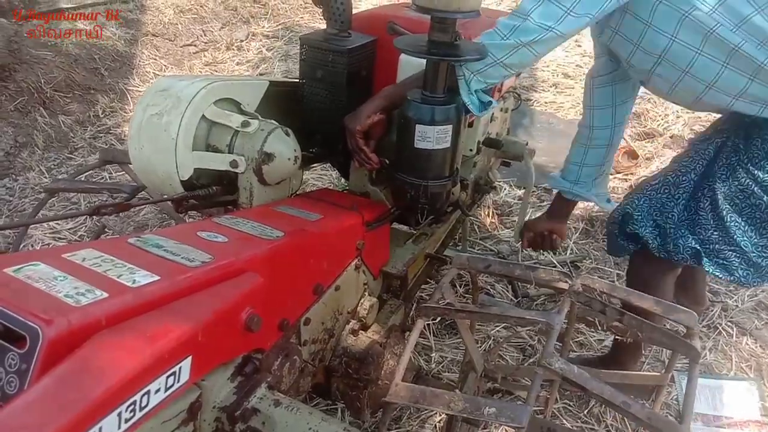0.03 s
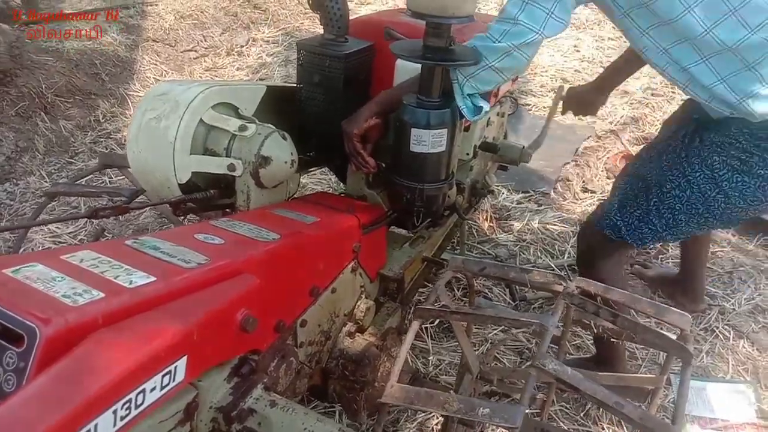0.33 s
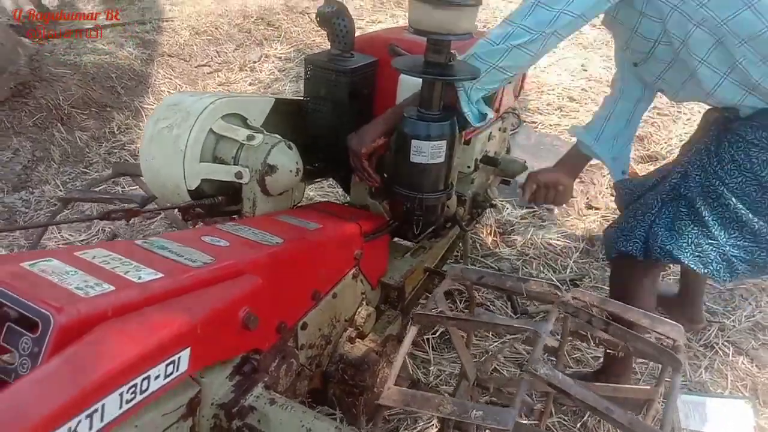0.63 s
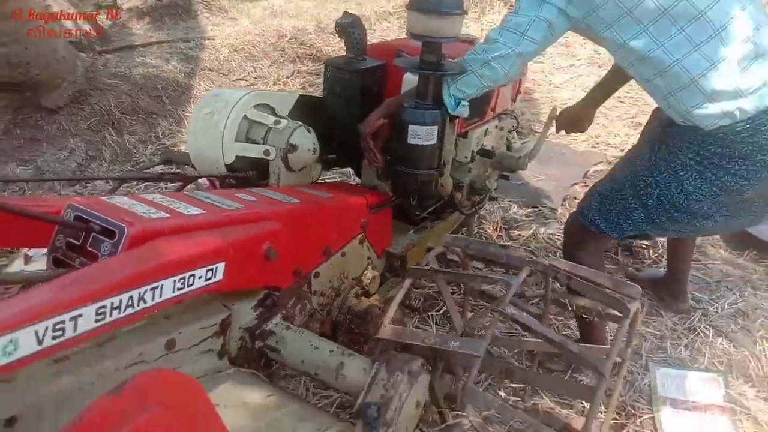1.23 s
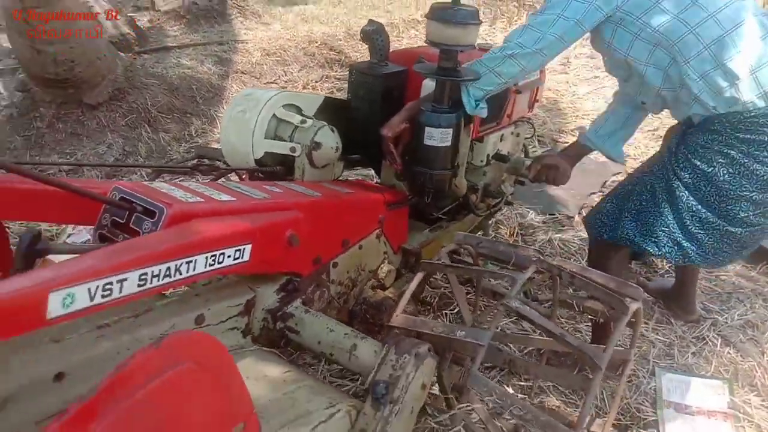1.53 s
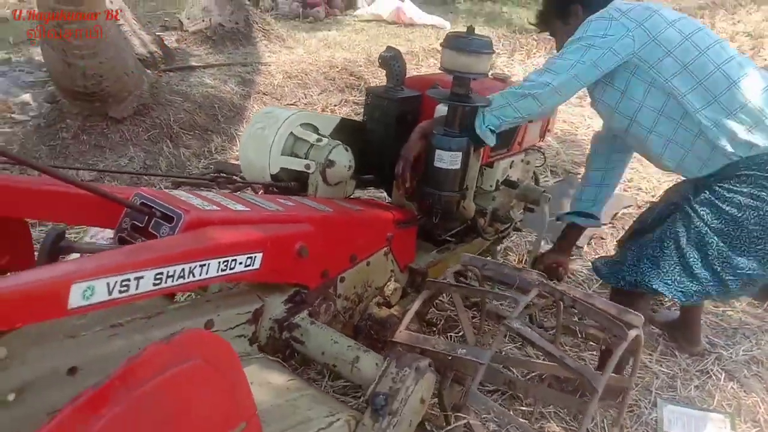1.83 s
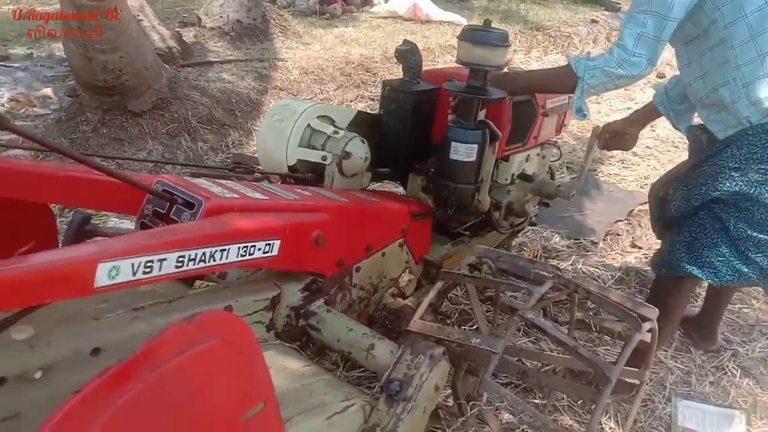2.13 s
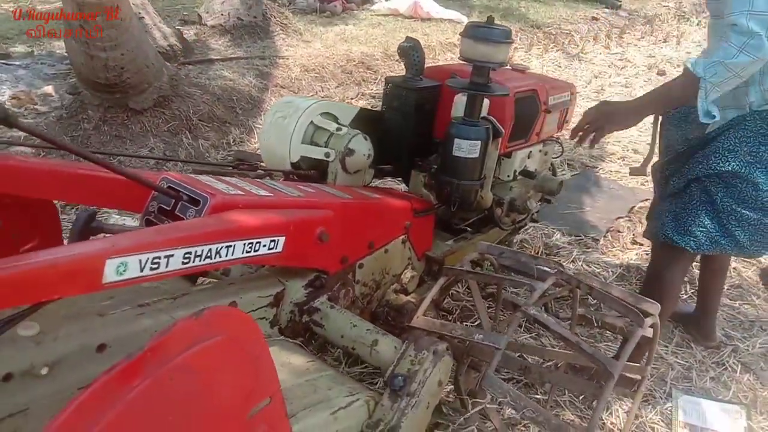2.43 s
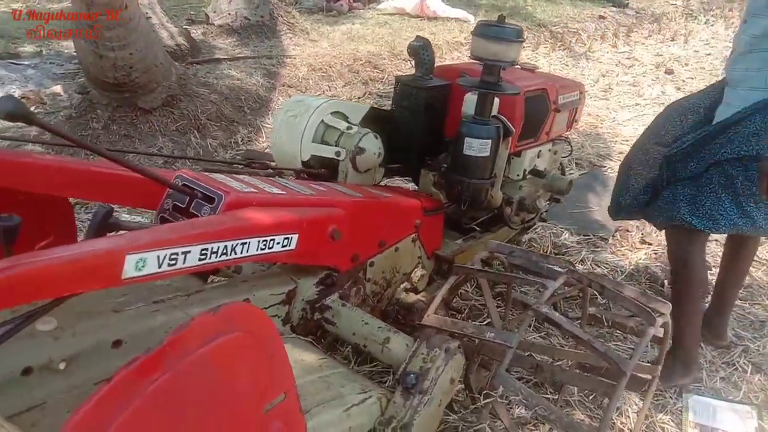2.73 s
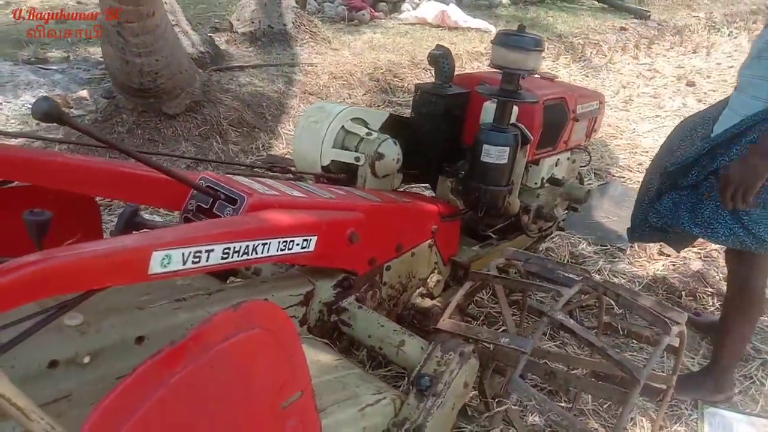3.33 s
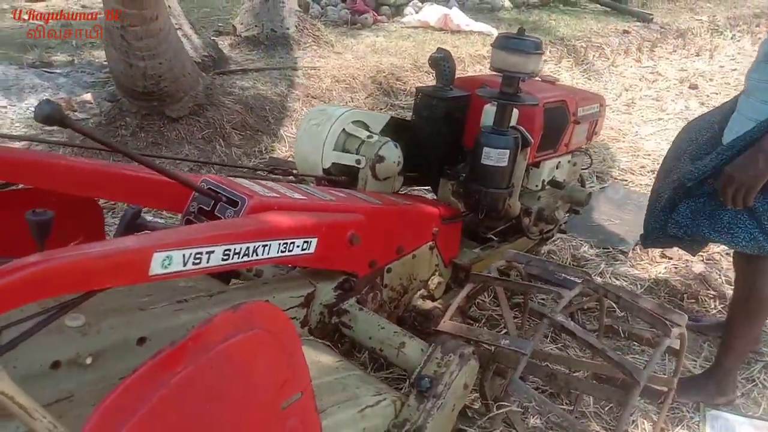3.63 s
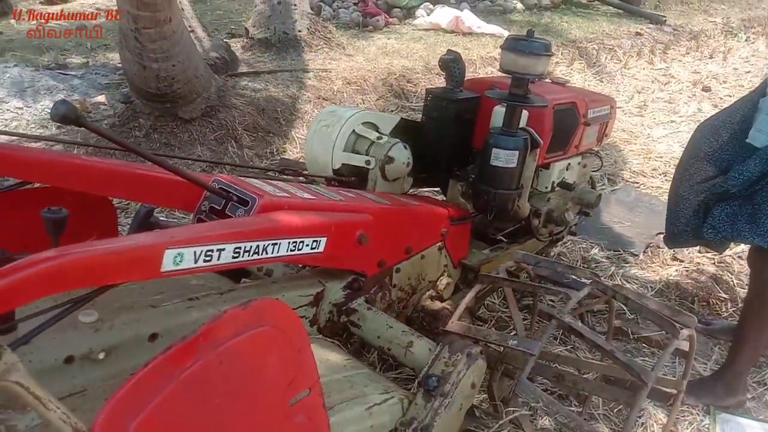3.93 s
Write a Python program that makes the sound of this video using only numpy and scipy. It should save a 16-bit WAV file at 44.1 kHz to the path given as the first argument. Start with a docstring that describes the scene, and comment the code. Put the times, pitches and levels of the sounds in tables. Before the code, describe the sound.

Close up in the open air, a farm tiller's diesel engine is hand-cranked with light ticks, dry squeaks and two thin squeals. It then fires and gathers speed, knocking and puffing over clanking metal.

```python
"""Hand-cranking a diesel tiller

A single-cylinder diesel is turned by hand outdoors: the valve gear ticks, the dry crank squeaks by
stick-slip friction and a rubbed steel part squeals. The engine catches and gathers speed. Each cycle
is a combustion knock, an exhaust chuff up to a quarter cycle later and the clatter of valves and
piston. Loose parts clank under the jolts, and the frame rings along in forced vibration."""
import sys
import numpy as np
from scipy import signal
from scipy.fft import rfft, irfft, next_fast_len
from scipy.io import wavfile
from scipy.ndimage import uniform_filter1d, map_coordinates

SR = 44100
rng = np.random.default_rng(int(sys.argv[2]) if len(sys.argv) > 2 else 0)


def to_wav(sig):
    """Store sig (one row per channel, or 1-D mono) as 16-bit WAV at the path in sys.argv[1].

    Samples outside -1..1 are clipped; the rate is SR.
    """
    pcm = np.clip(np.atleast_2d(sig), -1, 1) * 32767
    pcm = np.round(pcm).astype(np.int16)
    wavfile.write(sys.argv[1], SR, pcm.T)  # frames by channels


N = 176400

# firings (time [s], knock [dB], exhaust [dB], exhaust delay [cycles], clatter [dB])
FIRINGS = [(1.933, -35.5, -33.5, 0.19, -42), (2.269, -25, -29, 0.078, -37.5),
           (2.541, -25.5, -23, 0.12, -35.5), (2.769, -24.5, -25, 0.1486, -34),
           (2.976, -17.5, -22.5, 0.22, -30.5), (3.163, -18.5, -20, 0.16, -32.5),
           (3.335, -19, -20.5, .2, -30.5), (3.495, -20, -25, 0.19, -31), (3.644, -20.5, -21.5, 0.17, -31),
           (3.787, -18.5, -20.5, 0.19, -32), (3.921, -20, -24.5, 0.17, -30.5)]
# pressure swings of one knock (delay [s], frequency [Hz], level [dB], rise time [s])
PRESSURE_SWINGS = [(.0015, 1128, 0.5, 0.0021), (.009, 1003, -1, 0.0051)]
# valve and piston impacts within a cycle (delay [cycles], level [dB], t60 [s])
CYCLE_IMPACTS = [(.01, -4, 0.25), (.235, 4, 0.1), (.52, -1, 0.08)]
# impacts of loose parts (time [s], rattle [dB], thud [dB])
CLANKS = [(1.954, -39, -38), (1.998, -31.5, -37.5), (2.018, -35, -32), (2.195, -37.5, -32),
          (2.201, -27, -32.5), (2.335, -32.5, -27.5), (2.36, -30, -33), (2.482, -40, -48),
          (2.511, -29.5, -50), (2.523, -31.5, -30.5), (2.556, -28, -28), (2.597, -33, -28),
          (2.623, -26, -29.5), (2.72, -32.5, -34.5), (2.797, -28, -28.5), (2.838, -25, -25.5),
          (3.003, -28.5, -29.5), (3.015, -32.5, -26.5), (3.02, -29, -36), (3.072, -28.5, -41),
          (3.201, -30, -27), (3.251, -31.5, -34.5), (3.322, -33, -42), (3.375, -26, -36),
          (3.417, -32.5, -34), (3.506, -26, -37), (3.532, -27, -28.5), (3.581, -34, -49),
          (3.68, -27.5, -31.5), (3.732, -32.5, -31), (3.821, -27.5, -32), (3.952, -24.5, -27)]
# crank squeaks (time [s], length [s], start [Hz], middle [Hz], end [Hz], level [dB], octave [dB])
SQUEAKS = [(0.002, 0.037, 3620, 3480, 3400, -56, -18), (0.074, 0.017, 2740, 2700, 2710, -45.5, -22),
           (0.158, 0.009, 4100, 4230, 4400, -34, -28), (0.262, 0.018, 2830, 2697, 2730, -30, -20),
           (0.276, 0.022, 2810, 2690, 2650, -38.5, -18), (.715, .018, 4250, 4180, 4200, -56, -32),
           (0.807, 0.02, 2424, 2378, 2430, -24, 1), (0.821, 0.019, 2540, 2624, 2510, -33, -12),
           (0.964, 0.0285, 2925, 2774, 2630, -33.5, -11.5), (0.982, 0.0278, 2620, 2494, 2270, -33.5, -5.5),
           (1.201, 0.0434, 2746, 2820, 2610, -26, -18), (1.227, 0.015, 2620, 2570, 2590, -24.5, 1),
           (1.261, 0.02, 2420, 2424, 2370, -39.5, 0), (1.509, .029, 2700, 2670, 2680, -30, -19),
           (1.563, 0.0326, 2320, 2090, 2430, -38.5, -3), (1.593, 0.0182, 2340, 2680, 3060, -26.5, -10),
           (1.698, 0.013, 2230, 1960, 1980, -38, -11.5), (1.793, 0.026, 3250, 3020, 2900, -44, -22),
           (1.851, 0.0087, 2900, 2660, 2760, -28, -33), (1.893, 0.011, 6700, 6840, 6800, -46.5, -17),
           (1.923, 0.014, 7100, 7200, 7300, -57, -28)]

# brief events (time [s], level [dB])
CRANKING_TICKS = [(0.091, -41), (.196, -38), (.316, -39.5), (0.437, -38), (.581, -37.5), (0.673, -40),
                  (.694, -46), (0.781, -44.5), (.891, -38), (1.023, -40.5), (1.108, -42), (1.21, -38.5),
                  (1.315, -39.5), (1.438, -39.5), (1.525, -40), (1.615, -41), (1.719, -36), (1.837, -40)]  # valve gear turned by hand
AIR_GULPS = [(0.25, -49.5), (.58, -47.5), (.86, -47.5), (1.169, -42.5)]  # cylinder pumping before it fires
VALVE_SEATINGS = [(2.101, -55), (2.337, -43), (2.405, -48.5), (2.598, -39.5), (2.655, -44), (2.8204, -40),
                  (2.874, -48), (2.9306, -47.5), (3.0693, -50), (3.1222, -46.5), (3.2983, -45),
                  (3.4614, -44), (3.5327, -37), (3.6135, -42.5), (3.7565, -43.5), (3.8201, -42),
                  (3.8924, -45.5)]  # valves closing in the running engine

# envelopes (time [s], level [dB])
SQUEAL_ENVELOPE = [(0.269, -85), (0.284, -38), (0.294, -19.5), (.302, -42), (.311, -25.5), (0.328, -47.5),
                   (.43, -71), (1.07, -87), (1.108, -47), (1.143, -53.5), (1.162, -33), (1.192, -20),
                   (1.202, -32), (1.214, -32.5), (1.228, -48), (1.32, -72), (1.6, -87)]  # rubbed steel part
CHURN_ENVELOPE = [(0, -49), (.6, -48), (1.4, -49), (1.88, -48.5), (2.02, -36), (2.18, -44.5), (2.45, -40.5),
                  (2.7, -38.5), (3.1, -35), (4, -32)]  # gears and bearings

# resonances of the frame (frequency [Hz], bandwidth [Hz], gain [dB])
FRAME_MODES = [(367.2, 11.2, 1), (863, 31, -0.5), (984, 11, -15), (1295, 49, -1.5), (1924, 76, -12.5),
               (2800, 160, -8), (5040, 330, -1)]
# damped modes of the casing and the silencer (frequency [Hz], level [dB], t60 [s])
CASING_MODES = [(279.2, -8.5, 0.33), (869.7, -7.5, 0.23), (1130, -1, 0.19), (1272, -8, 0.25)]
SILENCER_MODES = [(107.4, -8.5, 0.19), (162, -4, 0.085), (267, -3.5, 0.16)]

# spectra of the noise sources (frequency [Hz], relative level [dB])
HISS_SPECTRUM = [(100, 12), (2000, 8), (6000, 2.0), (8500, -8), (11500, -6), (15500, -1)]
CRANKING_SPECTRUM = [(15, -29), (25, -16), (126, 4), (253, -6.5), (378, 3.5), (762, -9), (997, 6),
                     (1200, -1.5), (2060, -10.5), (2700, -5), (3720, -12), (4150, -25.5), (5730, -18),
                     (6550, -28), (8130, -48), (11200, -40), (15500, -63)]  # gears and bearings turned by hand
RUNNING_SPECTRUM = [(25, -68), (60, -10), (119, 7.5), (200, -2), (260, 5), (340, -0.5), (480, -4),
                    (700, -11.5), (900, -5.5), (1240, -1), (1570, -21), (2400, -11), (2770, -9),
                    (3500, -21), (5500, -26.5), (6550, -27), (8100, -49), (15500, -46)]  # gears and bearings under power
GULP_SPECTRUM = [(20, -17), (45, -15), (80, 1.5), (120, 8), (180, -18), (400, -56)]  # pumped air
COVER_SPECTRUM = [(1500, -24), (3000, -11), (4600, -2), (6600, 7), (8000, -17.5), (10500, -5.5),
                  (13000, -11), (15500, -16)]  # rattling covers
TICK_SPECTRUM = [(59, -47), (100, -33.5), (293, -3), (601, -18.5), (879, -1), (1210, -0.5), (1430, -14),
                 (2810, -5), (3320, -20), (5070, -23), (6660, -19.5), (8230, -44), (9950, -33.5),
                 (15500, -53)]  # valve gear
CLICK_SPECTRUM = [(1200, 0), (5500, 4), (8000, -1), (11000, -4.5), (15500, -10)]  # valve seats
RATTLE_SPECTRUM = [(100, -41.5), (600, -5.5), (1100, 2), (1550, -1.5), (2000, 6), (2900, 9), (3500, -1.5),
                   (5200, -1.5), (6600, -3.5), (8000, -18), (10000, -15), (13000, -32), (15500, -19)]  # steel on steel
THUD_SPECTRUM = [(25, -24), (50, -13.5), (110, 0.5), (200, 1.5), (280, -6.5), (450, -2.5), (720, -19.5),
                 (1000, -8.5), (1300, -8.5), (1600, -20), (2700, -26), (4000, -33.5), (8000, -70)]  # blows through the chassis
SILENCER_SPECTRUM = [(25, -45), (45, -32), (62, -3), (80, -13), (110, -3.5), (160, -0.5), (250, -4),
                     (320, -9), (380, -1), (500, -7.5), (720, -21), (1000, -11.5), (1280, -11.5),
                     (1600, -30), (2700, -23.5), (4000, -25), (8000, -72)]  # exhaust gas
BLOCK_SPECTRUM = [(35, -67), (60, -31), (335, 1.5), (657, -14), (849, -7), (999, -6.5), (1380, -3.5),
                  (1670, -16.5), (2840, -10), (3580, -19.5), (4220, -30), (4850, -23), (5580, -28),
                  (7900, -40), (15500, -64)]  # engine block

CONTACT_HOLD_S, CONTACT_T60_S = .002, .04


def amp(db):
    """Amplitude ratio of a level in decibels."""
    return 10 ** (np.asarray(db) / 20)


def unit_rms(x):
    """Normalisation to unit mean power."""
    return x / np.sqrt(np.mean(x ** 2) + 1e-20)


def clock():
    """Sample times in seconds."""
    return np.arange(N) / SR


def wobble(rate):
    """Smooth random modulation through `rate` knots a second."""
    return map_coordinates(rng.standard_normal(int(N * rate / SR) + 4), [clock() * rate])


def filtered(x, response):
    """Linear filtering: the spectrum is multiplied by a complex frequency response."""
    size = next_fast_len(N + SR // 2)
    return irfft(rfft(x, size) * response(np.fft.rfftfreq(size, 1 / SR)), size)[:N]


def coloured(x, spectrum, size=8192):
    """Spectral shaping by a minimum-phase filter of unit energy."""
    hz, db = np.transpose(spectrum)
    log_hz = np.log(np.fft.rfftfreq(size, 1 / SR) + 1)
    cepstrum = irfft(np.log(amp(np.interp(log_hz, np.log(hz), db))))
    cepstrum[1:size // 2] *= 2  # folding the cepstrum makes the filter causal
    cepstrum[size // 2 + 1:] = 0
    impulse = irfft(np.exp(rfft(cepstrum)))
    return signal.fftconvolve(x, impulse / np.linalg.norm(impulse))[:N]


def grit(grain_db, rate):
    """Random amplitude modulation clumps white noise of unit rms into tiny contacts."""
    return unit_rms(rng.standard_normal(N) * amp(grain_db * np.tanh(wobble(rate) / 2) * 1.7))


def bursts(rows, attack_s, hold_s):
    """Envelope of incoherent bursts (time [s], level [dB], t60 [s]), which add in power."""
    power, t = np.zeros(N + SR), np.arange(SR // 2) / SR
    for s, db, t60 in rows:
        shape = np.minimum(t / attack_s, 1) * amp(db - 60 * np.maximum(t - attack_s - hold_s, 0) / t60)
        power[round(s * SR):][:len(t)] += shape ** 2
    return np.sqrt(power[:N])


def rebounds(rows, gap_s, loss_db, count=4):
    """Inelastic impact: each contact is followed by weakening rebounds at uneven gaps."""
    out = []
    for (s, db, *_), draws in zip(rows, rng.standard_normal((len(rows), count, 2))):
        out.append((s, db, CONTACT_T60_S))
        for k, (late, size) in enumerate(draws, 1):
            out.append((s + gap_s * (k + 0.54 * np.tanh(late)), db - loss_db * k + 2 * size,
                        CONTACT_T60_S))
    return out


def pings(rows, hz, spread, t60, scatter_s, count=6):
    """Impact excitation: each contact strikes a few short-lived steel modes of its own."""
    out, t = np.zeros(N + SR), np.arange(SR // 10) / SR
    envelope = amp(-60 * t / t60) * np.minimum(t / 0.0017, 1)
    for (s, db, *_), draws in zip(rows, rng.standard_normal((len(rows), count, 3))):
        for pitch, late, size in draws:
            ring = envelope * np.sin(2 * np.pi * hz * np.exp(spread * np.tanh(pitch)) * t)
            out[round((s + scatter_s * abs(late)) * SR):][:len(t)] += amp(db + 2 * size) * ring
    return out[:N]


def ringing(rows, modes, attack_s, detune):
    """Free vibration: every blow excites the same damped modes, slightly varied each time."""
    out, t = np.zeros(N + SR), np.arange(SR // 3) / SR
    attack = np.minimum(t / attack_s, 1)
    for (s, db), draws in zip(rows, rng.standard_normal((len(rows), len(modes), 3))):
        for (hz, level, t60), (size, pitch, phase) in zip(modes, draws):
            mode = attack * np.sin(2 * np.pi * (hz * (1 + detune * pitch) * t + phase))
            out[round(s * SR):][:len(t)] += amp(db + level + 2 * size - 60 * t / t60) * mode
    return out[:N]


def cycles():
    """Each firing with the period [s] of its cycle appended."""
    periods = np.diff([row[0] for row in FIRINGS])
    return np.column_stack([FIRINGS, np.append(periods, periods[-1])])


def microphone_hiss(level_db=-75.5):
    """Stationary broadband noise: the faint steady hiss of the microphone."""
    return amp(level_db) * coloured(rng.standard_normal(N), HISS_SPECTRUM)


def yard_echoes(x, t60):
    """Scattering off the machine and the ground leaves a short, exponentially decaying tail."""
    t = np.arange(SR // 2) / SR
    tail = rng.standard_normal(len(t)) * amp(-60 * t / t60) * np.minimum(t / 0.0058, 1)
    return signal.fftconvolve(x, tail / np.linalg.norm(tail))[:N]


def frame_resonance(x):
    """Forced vibration: each mode of the frame responds as a second-order resonator."""
    return filtered(x, lambda f: sum(amp(db) * 1j * f * width / (hz * hz - f * f + 1j * f * width)
                                     for hz, width, db in FRAME_MODES))


def gear_churn(crossfade_s=0.17):
    """Contact noise of gears and bearings: a light rustle when cranked, a fuller rumble once running."""
    t = clock()
    running = np.clip((t - FIRINGS[0][0]) / crossfade_s, 0, 1)
    rustle = coloured(grit(grain_db=4.5, rate=200), CRANKING_SPECTRUM)
    rumble = coloured(grit(grain_db=4.0, rate=250), RUNNING_SPECTRUM)
    envelope = amp(np.interp(t, *np.transpose(CHURN_ENVELOPE)))
    return envelope * ((1 - running) * rustle + running * rumble)


def air_gulps(t60=0.15):
    """Unsteady flow: air pumped through the cylinder before it fires makes low puffs."""
    flow = bursts([(s, db, t60) for s, db in AIR_GULPS], attack_s=0.0067, hold_s=0.012)
    return coloured(flow * rng.standard_normal(N), GULP_SPECTRUM)


def cover_rattle(top_db=-41, db_per_doubling=23, delay_s=0.018, t60=.2):
    """Contact chatter: each firing shakes the covers, more strongly as the firing rate rises."""
    firings = cycles()
    final_period = firings[-1, -1]
    shakes = [(s + delay_s, top_db + db_per_doubling * np.log2(final_period / period), t60)
              for s, *_, period in firings]
    envelope = bursts(shakes, attack_s=0.0085, hold_s=0.044)
    return coloured(envelope * grit(grain_db=7, rate=220), COVER_SPECTRUM)


def valve_clicks():
    """Brief impacts have wide spectra: the valves snap onto their seats with a bright ring."""
    contacts = rebounds(VALVE_SEATINGS, gap_s=.006, loss_db=5)
    envelope = bursts(contacts, attack_s=.0006, hold_s=CONTACT_HOLD_S)
    snap = coloured(envelope * grit(grain_db=4, rate=1200), CLICK_SPECTRUM)
    return snap + amp(-7) * pings(VALVE_SEATINGS, hz=8800, spread=0.32, t60=0.044, scatter_s=.001)


def valve_gear_ticks():
    """Impact and rebound: the hand-turned valve gear chatters and excites the modes of the casing."""
    contacts = rebounds(CRANKING_TICKS, gap_s=.0052, loss_db=4)
    envelope = bursts(contacts, attack_s=0.00081, hold_s=CONTACT_HOLD_S)
    crack = coloured(envelope * grit(grain_db=3.0, rate=670), TICK_SPECTRUM)
    casing = ringing(CRANKING_TICKS, CASING_MODES, attack_s=CONTACT_HOLD_S, detune=0.0298)
    steel = pings(CRANKING_TICKS, hz=3866, spread=0.376, t60=0.022, scatter_s=0.0052)
    return amp(3) * crack + amp(-2) * casing + amp(-8) * steel


def crank_squeaks(harmonics=6, rasp_db=-14):
    """Stick-slip friction in the dry crank: short rasping glides whose harmonics trade strength."""
    tones, slip = np.zeros(N), np.zeros(N)
    jitter = 1 + .018 * wobble(700)
    flutter = amp(5 * np.array([wobble(250) for _ in range(harmonics)]))
    chop = amp(2.4 * wobble(300))
    phase_noise = .23 * np.array([wobble(1000) for _ in range(harmonics)])
    overtone = np.arange(harmonics)[:, None]  # 0 is the fundamental
    rolloff_db = 17.5 * np.sqrt(np.arange(harmonics - 1))  # from the octave upward
    for s, length, start, middle, end, db, octave_db in SQUEAKS:
        span = round(s * SR) + np.arange(int(length * SR))
        progress = np.linspace(0, 1, len(span))
        glide_hz = np.polyval(np.polyfit([0, .5, 1], [start, middle, end], 2), progress)
        phase = 2 * np.pi * np.cumsum(glide_hz * jitter[span]) / SR
        partials = np.sin((overtone + 1) * phase + overtone * phase_noise[:, span])
        gains = amp(np.append(0, octave_db - rolloff_db))[:, None] * flutter[:, span]
        tone = chop[span] * np.sum(gains * partials, axis=0) / np.linalg.norm(gains, axis=0)
        swell = amp(db) * np.abs(np.sin(np.pi * progress)) ** 0.65
        tones[span] += swell * unit_rms(tone)
        slip[span] += swell * amp(octave_db / 2)
    return tones + amp(rasp_db) * slip * coloured(grit(grain_db=2.5, rate=440), RATTLE_SPECTRUM)


def steel_squeal(mode_hz=6438, waver=0.0036, smoothing_s=.005):
    """Friction excites one high mode of a steel part: rough when driven hard, clean as it rings out."""
    level_db = np.interp(clock(), *np.transpose(SQUEAL_ENVELOPE))
    swing = np.sqrt(2) * amp(uniform_filter1d(level_db, round(smoothing_s * SR)))
    roughness = .4 * np.sqrt(swing / swing.max()) * wobble(500)
    phase = 2 * np.pi * np.cumsum(mode_hz * (1 + waver * wobble(200))) / SR + roughness
    octave = amp(-23.5) * swing ** 1.44 * np.sin(2 * phase)
    return swing * np.sin(phase) + octave


def clatter(thud_t60=0.21):
    """Impact noise: valves and piston strike at set points of the cycle; loose parts clank and rebound."""
    impacts = [(s + share * period, db + level + rng.normal(0, 1), t60)
               for s, *_, db, period in cycles() for share, level, t60 in CYCLE_IMPACTS]
    valves = bursts(impacts, attack_s=0.0013, hold_s=CONTACT_HOLD_S)
    bounces = rebounds(CLANKS, gap_s=0.0074, loss_db=5.5)
    loose = amp(-2) * bursts(bounces, attack_s=0.00074, hold_s=CONTACT_HOLD_S)
    blows = bursts([(s, db, thud_t60) for s, _, db in CLANKS], attack_s=0.0013, hold_s=0.0077)
    valve_pings = pings(impacts, hz=3600, spread=0.51, t60=0.017, scatter_s=0.0064)
    clank_pings = pings(CLANKS, hz=4180, spread=.42, t60=0.035, scatter_s=0.002)
    rattle = coloured(np.hypot(valves, loose) * grit(grain_db=2.0, rate=600), RATTLE_SPECTRUM)
    thuds = coloured(blows * rng.standard_normal(N), THUD_SPECTRUM)
    return amp(-5) * (valve_pings + clank_pings) + rattle + thuds


def exhaust_chuffs(t60=0.21, gas_db=-2):
    """Cavity resonance: gas rushes out as the exhaust valve opens, and the silencer rings."""
    openings = [(s + share * period, db) for s, _, db, share, _, period in cycles()]
    flow = bursts([(s, db + gas_db, t60) for s, db in openings], attack_s=0.0073, hold_s=0.0087)
    rush = coloured(flow * grit(grain_db=4.0, rate=270), SILENCER_SPECTRUM)
    return rush + ringing(openings, SILENCER_MODES, attack_s=0.013, detune=0.018)


def combustion_knock(swing_db=3.5, ring_db=-8, ring_t60=.09):
    """Impulsive excitation: combustion gives a few hard pressure swings, and the block rings on."""
    pressure, t = np.zeros(N + SR), np.arange(SR // 16) / SR
    for s, db, *_ in FIRINGS:
        for delay, hz, level, rise in PRESSURE_SWINGS:
            pitch, late, phase = rng.standard_normal(3)
            pulse = (t / rise * np.exp(1 - t / rise)) ** 3  # peaks at t = rise
            swing = pulse * np.sin(2 * np.pi * (hz * (1 + .025 * pitch) * t + phase))
            onset = round((s + delay * (1 + .07 * late)) * SR)
            pressure[onset:][:len(t)] += amp(db + level + swing_db) * swing
    ring = bursts([(s, db + ring_db, ring_t60) for s, db, *_ in FIRINGS], attack_s=0.0021, hold_s=.014)
    return pressure[:N] + coloured(ring * grit(grain_db=1.5, rate=460), BLOCK_SPECTRUM)


def scene():
    """Superposition of engine, frame and crank, heard in mono from the handlebars."""
    engine = (combustion_knock() + exhaust_chuffs() + clatter() + valve_clicks()
              + valve_gear_ticks() + air_gulps() + gear_churn() + cover_rattle())
    machine = amp(-2.0) * (engine + frame_resonance(engine))
    crank = crank_squeaks()
    echoes = amp(-14.5) * yard_echoes(crank, t60=0.21)
    return (machine + crank + echoes + steel_squeal() + microphone_hiss())[None]


def record(dry):
    """Band limiting: an ideal low-pass filter removes the highest treble."""
    return filtered(dry[0], lambda hz: hz < 15850)[None]


dry = scene()
out = record(dry)
to_wav(out)
```